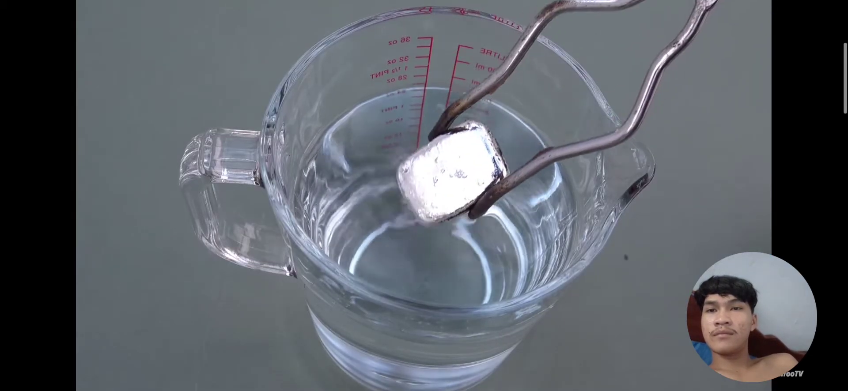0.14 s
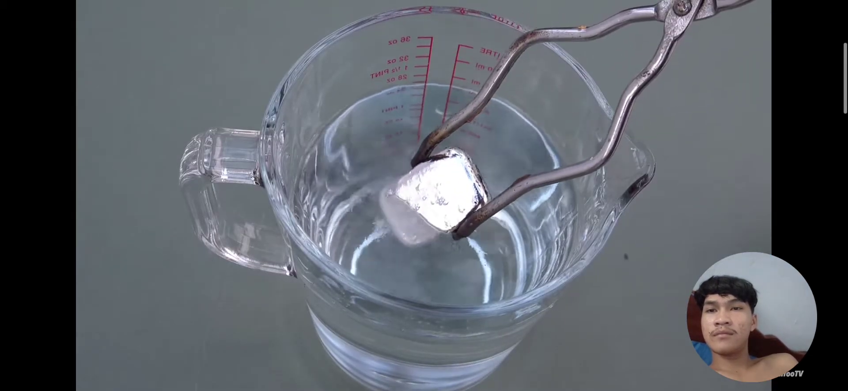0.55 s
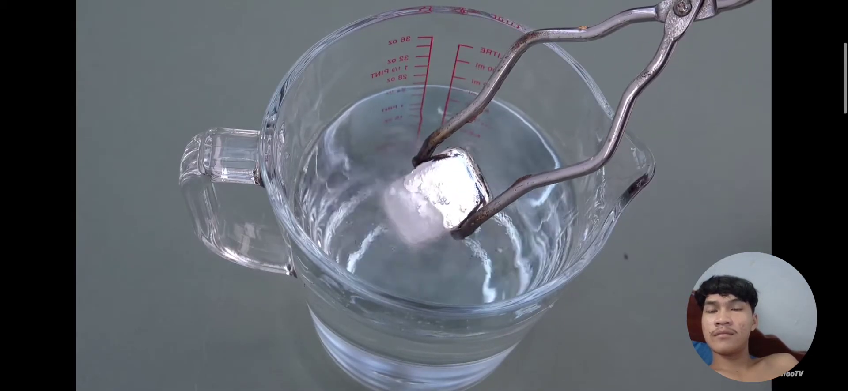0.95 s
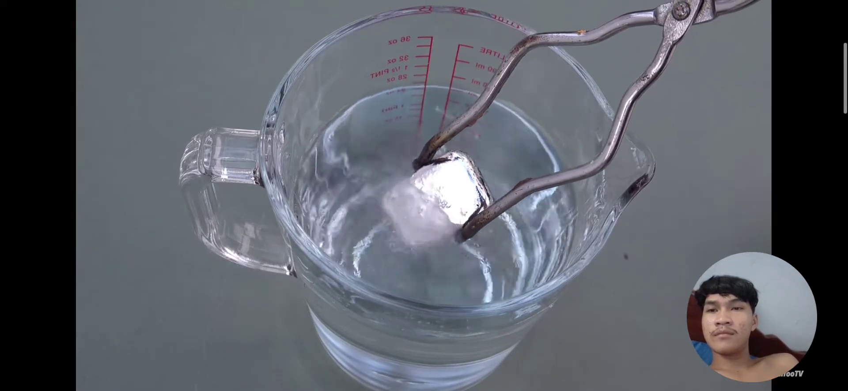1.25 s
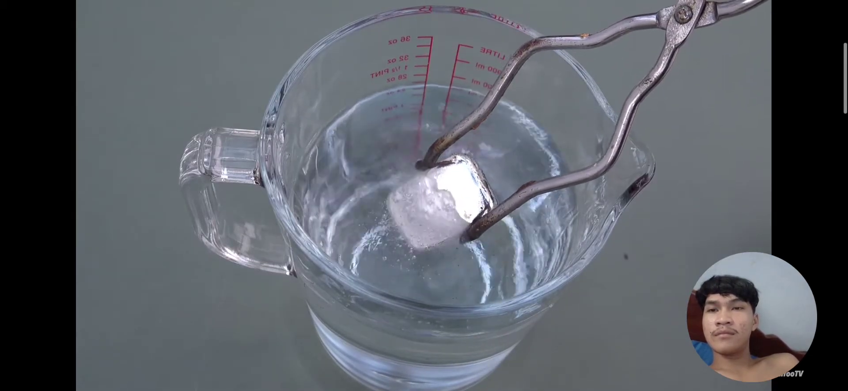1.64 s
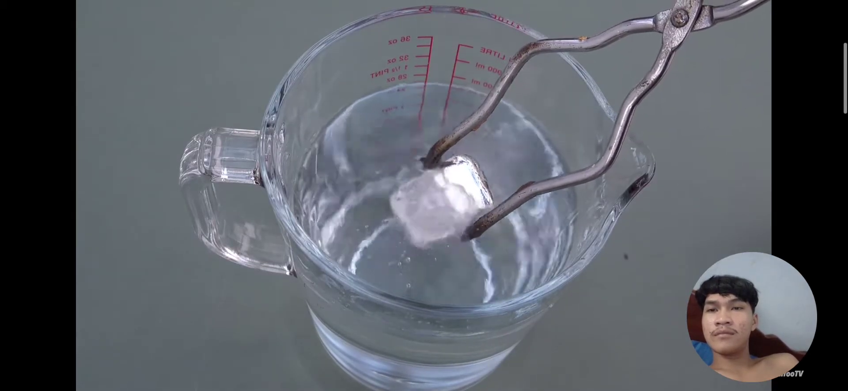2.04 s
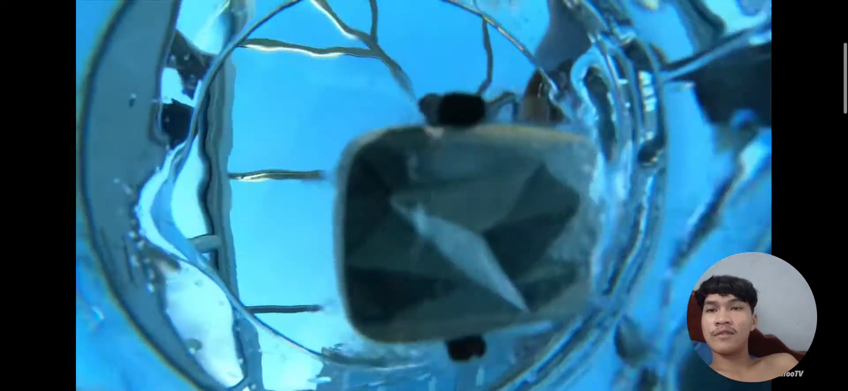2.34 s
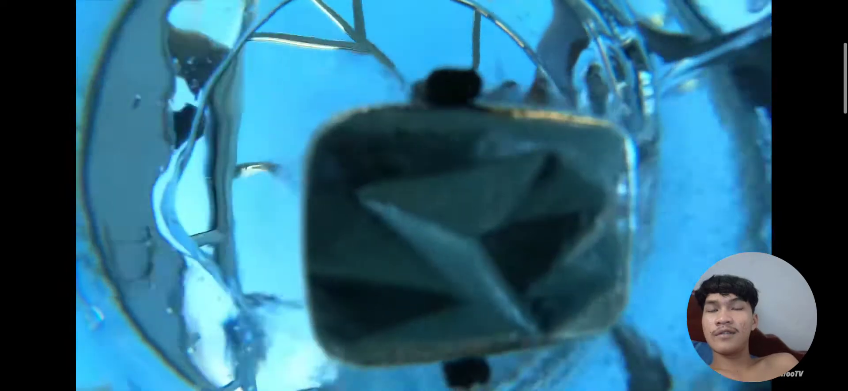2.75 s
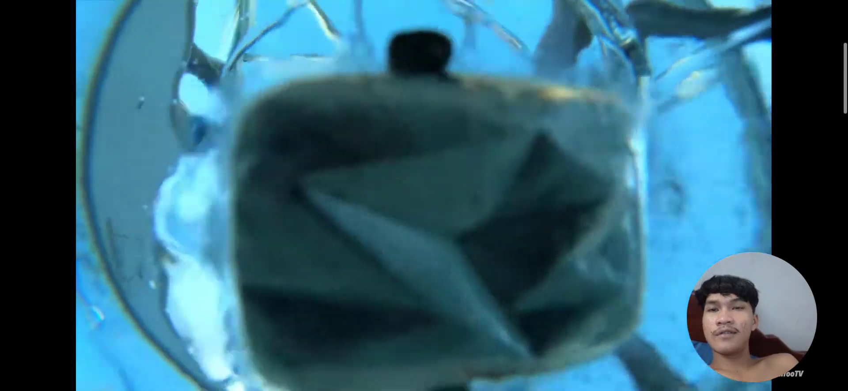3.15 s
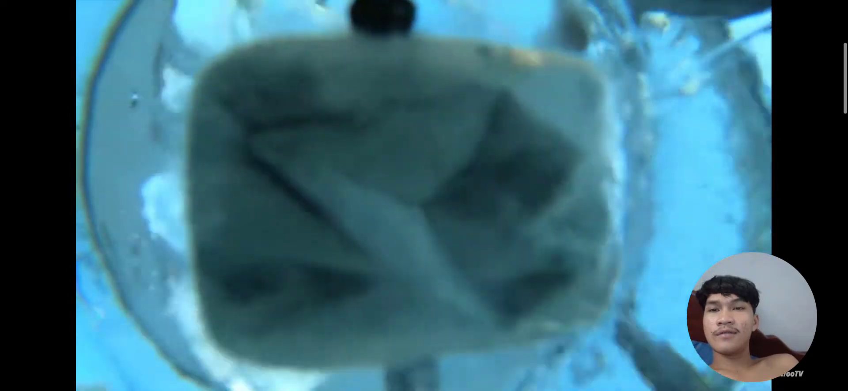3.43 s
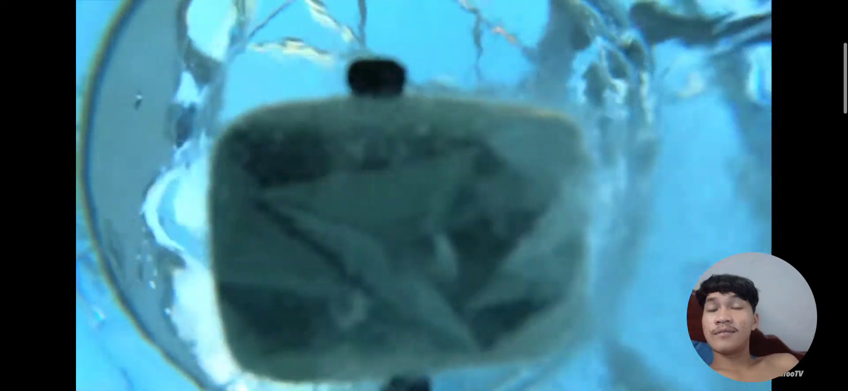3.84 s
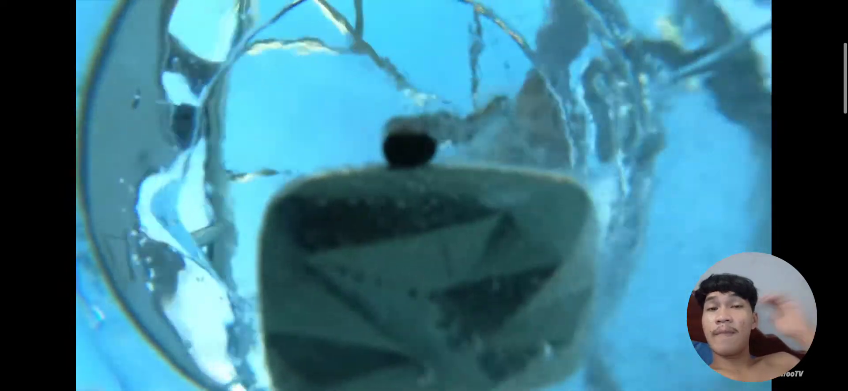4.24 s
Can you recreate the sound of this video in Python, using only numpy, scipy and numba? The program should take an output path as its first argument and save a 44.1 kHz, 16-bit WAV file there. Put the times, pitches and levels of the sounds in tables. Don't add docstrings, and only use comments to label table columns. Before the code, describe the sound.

A hot metal block is lowered by tongs into a glass jug of water. Close from above, bright hiss and thin squeals arrive, whistles slide down, and a hollow sizzle grows louder. A hard cut to below the jug brings slopping water, glassy pings and jolts, then deep, dense bubbling that rumbles, thins out and stops in quiet room air.

```python
import sys
import numpy as np
from scipy import signal
from scipy.io import wavfile
from scipy.ndimage import uniform_filter1d, minimum_filter1d
from numba import njit

SR = 44100
rng = np.random.default_rng(int(sys.argv[2]) if len(sys.argv) > 2 else 0)


def generate_wav(signal):
    frames = np.transpose(np.atleast_2d(signal))
    scaled = np.clip(frames, -1, 1) * 32767
    pcm = np.round(scaled).astype(np.int16)
    wavfile.write(sys.argv[1], SR, pcm)


def rack_gain(trim_db):
    fader = np.asarray(trim_db, float)
    return 10 ** (fader / 20)


N = 193466

CUT_S = 2.2145
COOL_S = 4.037

# [t/s, level/dB]
FLASH = [(.0912, -36.5), (.28, -34.5), (.284, -33.5), (.368, -36.5), (.41, -35), (.521, -29.5), (.76, -34),
         (.814, -37), (1.204, -37.5), (1.33, -36), (1.468, -30.5), (1.56, -26), (1.57, -32.5),
         (1.654, -33.5), (1.714, -26.5), (1.89, -25.5), (1.93, -22), (2.21, -22)]
# [f/Hz, level/dB, time to fall 60 dB/s]
GLASS = [
    (2705, 0, .25),
    (4430, -9, .2),
    (4877, -16, .15),
    (5141, -10, .2),
    (5744, -16, .2),
    (7526, -14, .2),
]
# [f/Hz, level/dB per Hz]
ROOM = [(24, -56), (40, -13.5), (627, -44.5), (846, -11.5), (1500, -8), (2140, -4), (2300, -13),
        (2540, -4.5), (4090, -8), (5390, -12.5), (6580, -19), (12600, -8.5), (15800, -15)]


def times():
    return np.arange(N) / SR


def evened(x):
    return x / np.sqrt(np.mean(x ** 2) + 1e-20)


def columns(rows):
    s, *values = np.transpose(rows)
    return [np.interp(times(), s, v) for v in values]


def add(mix, s, sound):
    part = mix[round(s * SR):][:len(sound)]
    part += sound[:len(part)]


def between(s0, s1, fade=.001):
    t = times()
    return np.clip((t - s0) / fade, 0, 1) * np.clip((s1 - t) / fade, 0, 1)


def colour(x, points):
    hz = np.fft.fftfreq(8192, 1 / SR)
    f, db = np.transpose(points)
    curve_db = np.interp(np.log(abs(hz) + 1), np.log(f + 1), db, -90, -90)
    log_gain = curve_db * np.log(10) / 20
    taps = np.fft.ifft(np.exp(np.conj(signal.hilbert(log_gain)))).real[:4096]
    return signal.oaconvolve(x, taps)[:len(x)]


def flicker(per_s):
    span = max(int(SR / per_s), 2)
    noise = rng.standard_normal(N)
    return evened(uniform_filter1d(uniform_filter1d(noise, span), span))


def seethe(points, per_s, spread_db, flicker_db, flicker_per_s=60):
    size = rack_gain(spread_db * np.minimum(rng.exponential(1, N), 5))
    happens = rng.random(N) < per_s / SR
    bursts = size * happens * rng.standard_normal(N)
    return evened(colour(bursts, points) * rack_gain(flicker_db * flicker(flicker_per_s)))


@njit
def smooth(x, width_hz):
    y, state = np.empty_like(x), 0j
    for i in range(len(x)):
        r = np.exp(-np.pi * width_hz[i] / 44100)
        state = r * state + np.sqrt(1 - r * r) * x[i]
        y[i] = state * (1 - r) ** .25
    return y


def resonate(x, hz, width_hz):
    turn = np.exp(2j * np.pi * np.cumsum(hz) / SR)
    return (turn * smooth(smooth(x / turn, width_hz), width_hz)).real


def whistle(hz, width_hz):
    width = np.maximum(width_hz, 10) * np.ones(N)
    return evened(resonate(rng.standard_normal(N), hz * np.ones(N), width))


def bubble(db, hz, t60, glide=0, rise=0.0027):
    t = np.arange(int(t60 * SR)) / SR
    envelope = rack_gain(db - 60 * t / t60) * np.minimum(t / rise, 1)
    return envelope * np.sin(2 * np.pi * hz * (t + glide * t ** 2 / 2))


def wake(fierce_db, faint_db, full_s, full_db, climb, growth, share):
    late = times() - full_s
    db = full_db + climb * np.minimum(late, 0) + growth * np.maximum(late, 0)
    db += share * (fierce_db + 30)
    return np.hypot(rack_gain(db), rack_gain(faint_db) * between(FLASH[0][0] - .03, 9, 0.13))


def arc(peak_s, peak_db, climb, fall, cool_fall):
    late = times() - peak_s
    db = peak_db + climb * np.minimum(late, 0) - fall * np.maximum(late, 0)
    return db - cool_fall * np.maximum(times() - COOL_S, 0)


def with_plunge(db, plunge_db, fall, until_s):
    dying_db = plunge_db - fall * np.maximum(times() - CUT_S, 0)
    return np.hypot(rack_gain(db), rack_gain(dying_db) * between(-1, until_s, 0.016))


def steam():
    # [f/Hz, level/dB per Hz]
    hiss = [(3290, -53), (5600, -27), (5980, -6), (7020, 2.5), (8380, 1), (9840, 3.5), (11800, 2),
            (13500, 3.5), (15100, 1), (15800, -0.5)]
    sizzle = [(1120, -8.5), (1900, 4), (2130, 0.5), (2520, 0.5), (3460, 1), (4070, -1.5), (4330, -5.5),
              (5270, -3), (5530, -2), (5750, -19), (6100, -12), (7930, -33), (13400, -120)]
    jug_note = [(320, -34.5), (550, -22), (752, -10), (816, -2.5), (988, 0.5), (1200, -1), (1460, -5.5),
                (1790, -10), (2200, -23), (2860, -54), (4840, -120)]
    stir = [(12, -70), (20, -18.5), (91, -23), (134, -6), (189, -12), (338, -4.5), (552, -10.5),
            (700, -2.5), (910, -19.5), (1540, -120)]
    # [f/Hz, level/dB]
    jug_glass = [
        (3232, -50),
        (3531, -50),
        (3821, -48),
        (6824, -52),
    ]
    # [t/s, peak level/dB, f/Hz]
    pops = [
        (0.745, -15.5, 1060),
        (1.017, -16.5, 990),
        (1.057, -13, 1160),
        (2.194, -7, 1067),
    ]

    fierce_db, = columns(FLASH)
    surge = rack_gain(0.82 * flicker(68))
    walls = evened(sum(rack_gain(db) * whistle(hz, 33.0) for hz, db in jug_glass))
    sizzle_gain = wake(fierce_db, -56.5, full_s=.44, full_db=-28.5, climb=105, growth=1.9, share=.42)
    jug_gain = wake(fierce_db, -49.5, full_s=0.8148, full_db=-25, climb=64, growth=-0.4, share=-0.07)
    stir_gain = wake(fierce_db, -74, full_s=1.0, full_db=-39.5, climb=50.5, growth=0, share=-0.04)

    out = rack_gain(fierce_db) * surge * seethe(hiss, 20000, 1.3, 0.96, 200)
    out += sizzle_gain * 0.68 * surge * (seethe(sizzle, 15000, 0.52, 0.19) + 0.21 * walls)
    out += jug_gain * seethe(jug_note, 8000, 2.23, 0.2)
    out += stir_gain * seethe(stir, 6000, 1.3, .4, 20)
    for s, db, hz in pops:
        add(out, s, bubble(db - 4.0, hz, 0.012, rise=0.0003))
    add(out, 2.1608, -bubble(-6, 3000, .0015, rise=1 / SR))
    return out * between(FLASH[0][0], 9, .0015)


def pocket(width, start, length, first_hz, last_hz, db):
    age = np.clip((times() - start) / length, 0, 1)
    wobble = 1 + .015 * flicker(50)
    hz = first_hz * (last_hz / first_hz) ** age * wobble
    shape = np.minimum(age / .15, 1) * np.minimum((1 - age) / .55, 1)
    part = slice(int(start * SR), int((start + length) * SR))
    sound = rng.standard_normal(N)[part]
    for again in range(2):
        sound = evened(resonate(sound, hz[part], width * hz[part]))
    return start, (rack_gain(db + 2.65 * flicker(55)) * shape)[part] * sound


def squeal(s0, s1, hz, db):
    part = slice(int(s0 * SR), int(s1 * SR))
    tone = whistle(hz * (1 + .003 * flicker(8)), 45)
    sound = (rack_gain(1.2 * flicker(18)) * tone)[part]
    return s0, rack_gain(db) * evened(sound) * between(s0, s1, .02)[part]


def pockets():
    # [start t/s, length/s, first f/Hz, last f/Hz, level/dB]
    loose_pockets = [(0.32, 0.082, 15000, 12000, -38.5), (.098, 0.016, 9200, 10000, -36),
                     (1.66, .5, 3300, 3400, -33), (1.89, .7, 3400, 2930, -30),
                     (0.1, 0.074, 8700, 11500, -36.5), (0.15, 0.19, 8800, 6000, -33.5),
                     (0.21, 0.22, 6500, 4400, -39), (0.532, 0.32, 2100, 820, -36.5),
                     (0.62, 0.3, 1300, 900, -30), (0.292, 0.14, 5500, 3500, -38),
                     (.53, .19, 5500, 4300, -38), (.0985, 0.013, 9200, 8900, -25),
                     (0.096, 0.032, 15000, 13000, -22.5), (0.1, 0.17, 16400, 11000, -26.5),
                     (0.417, 0.06, 12600, 11300, -26.5), (.49, 0.073, 2850, 2800, -40),
                     (0.33, .035, 11000, 11000, -37)]
    tight_pockets = [(.097, 0.049, 7950, 7700, -32), (.13, 0.053, 7800, 7200, -44.5),
                     (.19, 0.1, 7300, 6160, -36.5), (.255, 0.051, 6030, 5500, -43),
                     (.3, 0.18, 5440, 5000, -48), (0.367, 0.07, 4250, 4000, -33),
                     (0.413, 0.03, 3750, 2730, -22), (0.427, 0.036, 2840, 2660, -26),
                     (.455, 0.046, 2870, 2700, -29.5), (.545, 0.11, 5400, 5000, -33),
                     (0.6, 0.13, 4900, 4200, -39), (.49, 0.067, 2790, 2700, -37),
                     (.56, .12, 1900, 1300, -37)]
    # [start t/s, end t/s, f/Hz,
    # level/dB]
    squeals = [(.17, .37, 9325, -40), (.31, .4, 6940, -45), (.42, .58, 6450, -46), (.33, .46, 4550, -45),
               (0, .37, 4160, -62), (0, .1, 4510, -62), (.365, .43, 4200, -32), (.28, .37, 8450, -46),
               (.4, .46, 6950, -48), (.2, .35, 4550, -58), (.45, 1.6, 4240, -46), (.46, 1.38, 4550, -47.5),
               (.61, .7, 4250, -38), (.74, .83, 4230, -42), (.58, .65, 4560, -43), (.73, .79, 4550, -44)]

    out = np.zeros(N)
    for width, rows in (.55, loose_pockets), (.2, tight_pockets):
        for row in rows:
            add(out, *pocket(width, *row))
    for row in squeals:
        add(out, *squeal(*row))
    band = signal.cheby2(8, 45, [520, 16100], "bandpass", fs=SR, output="sos")
    return signal.sosfilt(band, out)


def bloops():
    # [t/s, peak level/dB, f/Hz]
    collapses = [(2.742, -16, 615), (2.847, -17, 522), (2.878, -12, 610), (2.913, -13, 592),
                 (2.964, -11.5, 827), (2.993, -17, 620), (3.075, -13, 616), (3.112, -15, 583),
                 (3.149, -11, 544), (3.229, -4.5, 555), (3.304, -8, 600), (3.335, -5.5, 561),
                 (3.352, -6.5, 523), (3.379, -13, 533), (3.398, -7, 641), (3.431, -4, 538),
                 (3.463, -5, 531), (3.484, -8.5, 533), (3.521, -12, 511), (3.549, -17.5, 517),
                 (3.577, -12, 627), (3.61, -9, 509), (3.655, -9, 568), (3.697, -5, 517), (3.769, -12, 525),
                 (3.795, -5.5, 559), (3.821, -9, 550), (3.84, -9.5, 519), (3.905, -6.5, 540),
                 (3.936, -2.5, 475), (3.989, -5.5, 452), (4.014, -4.5, 385), (4.038, -4.5, 428),
                 (4.082, -8.5, 614), (4.122, -9.5, 417), (4.164, -12, 581), (4.202, -12, 490),
                 (4.309, -19, 795)]

    out = np.zeros(N)
    hush_db = -5 * between(4.357, 9, .004)
    hush_s = 0.005
    for s, db, hz in collapses:
        add(out, s, bubble(db - 3, hz, t60=.07, glide=2.5, rise=.002))
        hush_db = hush_db - np.exp(-((times() - s + hush_s) / hush_s) ** 2)
    return out, rack_gain(hush_db)


def boil():
    # [t/s, level/dB, pitch of the typical bubble f/Hz]
    boil_curve = [(2.215, -37, 796), (2.269, -32, 813), (2.5, -26.5, 747), (2.588, -22.5, 662),
                  (2.724, -19.5, 651), (2.902, -18, 610), (3.02, -17.5, 665), (3.108, -18.5, 600),
                  (3.142, -15.5, 656), (3.448, -18.5, 545), (3.638, -17, 575), (3.678, -17.5, 607),
                  (3.86, -18, 586), (3.98, -21, 466), (4.1, -20, 467), (4.16, -21, 552), (4.387, -27, 560)]
    # [t/s, f/Hz]
    heave_curve = [
        (2.21, 95.9),
        (2.3, 88.9),
        (2.45, 90.4),
        (2.6, 127.6),
        (2.9, 121.8),
        (3.05, 80.3),
        (3.3, 127.5),
        (4.39, 130.3),
    ]
    # [t/s, half length/s, rumble level/dB, big bubble level/dB, small bubble level/dB]
    bursts = [
        (2.724, 0.049, 3, 6.5, 1),
        (2.893, 0.076, 5.5, 4.5, 2.5),
        (3.098, 0.088, 4.5, 4, 9),
        (3.219, 0.063, -0.7, 7.5, 6.5),
        (3.361, 0.11, 0, 6.5, 2),
        (3.69, 0.072, -0.5, -4.5, 1),
    ]
    # [f/Hz, level/dB per Hz]
    rumble_colour = [(8.8, -43.5), (15, -9.5), (38, -11.5), (76, 0.5), (124, 0.5), (161, -0.5), (260, -7.5),
                     (340, -25), (570, -120)]
    body = [(240, -18.5), (400, -9.5), (426, -8), (532, 0), (620, 0), (709, -5), (850, 1), (1090, -14),
            (1250, -24.5), (1620, -59), (2750, -120)]
    big_colour = [(120, -32.5), (200, -4.5), (242, 0), (377, -3), (470, 2), (610, -28), (1030, -120)]
    small_colour = [(590, -21.5), (1000, 0.5), (1100, -3), (1340, -3.5), (1420, -5.5), (1760, -17.5),
                    (1990, -24), (2900, -44.5), (3770, -82), (6380, -120)]

    boil_db, hz = columns(boil_curve)
    rumble_db, big_db, small_db = sum(
        np.outer(db, np.exp(-((times() - s) / half) ** 2)) for s, half, *db in bursts)
    rumble_db = rumble_db + arc(peak_s=3.0, peak_db=-21, climb=16.5, fall=5, cool_fall=55.5)
    big_db = big_db + boil_db + arc(peak_s=3.5, peak_db=-6, climb=16.5, fall=0.5, cool_fall=24.5)
    big_db -= 8 * np.log2(hz / 600)
    small_db = small_db + arc(peak_s=2.585, peak_db=-28.5, climb=220, fall=8, cool_fall=12)
    rumble = with_plunge(rumble_db, -23.5, fall=.5, until_s=2.53)
    big = with_plunge(big_db, -29, fall=94, until_s=2.5)
    small = with_plunge(small_db, -26, fall=62, until_s=2.5)

    throb = rack_gain(0.5 * flicker(45))
    note = evened(resonate(seethe(body, 4000, 1.5, .3), hz, np.full(N, 115.)))
    heave_hz, = columns(heave_curve)
    heave = evened(resonate(seethe(rumble_colour, 2000, 2.0, 0.33), heave_hz, np.full(N, 60.)))
    out = rack_gain(boil_db) * throb * evened(seethe(body, 4000, 0.98, 0.32) + 0.68 * note)
    out += big * throb * seethe(big_colour, 1500, 1.4, 0.43, 30)
    out += rumble * evened(seethe(rumble_colour, 2000, 1.2, 0.25, 9.3) + 0.53 * heave)
    out += small * throb * seethe(small_colour, 7000, 1.8, .6)
    single, hush = bloops()
    return out * hush + single


def slops():
    # [t/s, peak level/dB, hold/s, time to fall 60 dB/s, brightness level/dB]
    gusts = [(2.204, -20, 0.014, 0.038, -38), (2.222, -38, .03, .06, -10),
             (2.255, -26.5, 0.0096, 0.06, -17), (2.264, -32, 0.015, 0.051, -23),
             (2.274, -28, 0.0042, 0.086, -6), (2.3, -27, 0.032, 0.1, -13.5),
             (2.333, -16.5, 0.0066, 0.053, -14), (2.342, -28, 0.012, 0.04, -12),
             (2.374, -29.5, 0.02, 0.07, -15), (2.4094, -62, 0.012, 0.049, -13),
             (2.45, -33.5, 0.014, 0.059, -5), (2.462, -27, 0.006, 0.054, -14),
             (2.472, -26.5, 0.0086, 0.035, -20), (2.5, -50, 0.0071, 0.083, 8),
             (2.526, -41.5, 0.0066, 0.06, 4), (2.572, -56.5, 0.015, 0.06, 16),
             (2.596, -45.5, 0.011, 0.066, -3)]
    # [t/s, peak level/dB]
    knocks = [(2.2265, -35), (2.2365, -36), (2.246, -34), (2.2627, -28), (2.277, -31), (2.3096, -27),
              (2.318, -31), (2.3405, -24), (2.352, -30), (2.3869, -29), (2.394, -32), (2.404, -36),
              (2.4637, -29), (2.481, -30), (2.5331, -44)]
    # [f/Hz, level/dB per Hz]
    slop = [(350, -49), (600, 0), (1000, -9.5), (1160, -3.5), (1540, -2.5), (1810, -10), (1980, -21),
            (2450, -24.5), (2890, -25), (4520, -23.5), (5480, -39), (6100, -35.5), (7930, -67.5),
            (13400, -120)]
    spray = [(3410, -25.5), (5800, -4), (7600, -1.5), (7940, -4), (9370, -6.5), (10200, -11),
             (13000, -29.5)]

    t, low, high = times(), np.zeros(N), np.zeros(N)
    for s, db, hold, t60, bright_db in gusts:
        fall_db = 60 * np.maximum(t - s - hold, 0) / t60
        gust = np.clip((t - s) / 0.013, 0, 1) * rack_gain(db - fall_db)
        low += gust ** 2
        high += (gust * rack_gain(bright_db)) ** 2
    wall = np.sqrt(low) * seethe(slop[5:], 5000, 2.4, 1.6, 150) * rack_gain(-13)
    out = wall + np.sqrt(low) * seethe(slop[:6], 4000, 0.87, 0.99, 100) * rack_gain(4.5)
    out += np.sqrt(high) * seethe(spray, 11000, 1.8, 0.88, 150) * rack_gain(-14.5)

    ring = np.zeros(SR // 2)
    for hz, db, t60 in GLASS:
        add(ring, 0, bubble(db, hz, t60, rise=.0002))
    out += rack_gain(-41) * signal.oaconvolve(wall, ring)[:N]
    for s, db in knocks:
        rap = rng.standard_normal(900) * rack_gain(-60 * np.arange(900) / SR / .025)
        add(out, s, rack_gain(db + 26) * colour(rap, slop[6:]))
    return out


def plunge_bubbles():
    # [t/s, peak level/dB, f/Hz]
    cracks = [(2.2563, -18, 1270), (2.2648, -17, 1300), (2.2752, -18, 1520), (2.3101, -22, 1750),
              (2.3101, -16, 1530), (2.3336, -12, 1270), (2.386, -23, 1200), (2.386, -27, 1430),
              (2.4384, -25, 1290), (2.4613, -21, 1400), (2.4798, -21, 1360), (2.5057, -31, 1200),
              (2.5137, -31, 1220)]
    # [t/s, peak level/dB, f/Hz, time to fall 60 dB/s]
    gulps = [(2.2155, -26, 900, .02), (2.275, -10.5, 882, 0.03), (2.311, -11.5, 967, 0.08),
             (2.327, -8.5, 984, 0.044), (2.338, -6, 954, 0.034), (2.352, -10, 1065, .04),
             (2.386, -11.5, 1006, 0.049), (2.409, -42, 5170, 0.081), (2.429, -24, 934, 0.033),
             (4.07, -11, 616, 0.06), (3.305, -11.5, 890, .04), (2.4641, -4, 834, 0.035),
             (2.4641, -27.5, 3480, 0.029), (2.4816, -16, 1407, 0.032), (2.534, -49, 7600, .1),
             (2.533, -49, 5750, 0.11)]
    # [t/s, peak level/dB, f/Hz, time to fall 60 dB/s, pitch glide/(1/s), rise/s]
    swellers = [
        (2.2185, -3, 1510, 0.045, -2.5, 0.004),
        (2.262, -26.5, 3510, .03, -20, 0.0022),
        (2.332, -9.5, 2540, 0.044, -4.5, 0.012),
        (2.596, -41, 7760, 0.02, -38, 0.0022),
        (2.6, -47, 4700, .03, -5, .002),
    ]
    # [t/s, peak level/dB, f/Hz, time to fall 60 dB/s]
    thuds = [
        (2.2118, -12, 325, 0.028),
        (2.223, -13.5, 82.5, 0.12),
        (2.275, -13.5, 80, 0.16),
        (2.314, -17, 78.7, 0.25),
        (2.378, -9, 87, 0.11),
    ]
    # [t/s, peak level/dB, f/Hz, time to fall 60 dB/s]
    strikes = [(2.224, -42, 2705, 0.13), (2.2627, -32.5, 2710, 0.18), (2.3096, -34, 2700, 0.11),
               (2.392, -34.5, 2720, 0.13), (2.485, -42.5, 2715, 0.16), (2.41, -48, 4800, .1),
               (2.405, -48, 4450, .1), (2.4637, -33, 2000, .03), (2.236, -46, 4480, .25),
               (2.262, -41, 4450, 0.33), (2.23, -52, 5150, 0.26), (2.318, -42, 4000, .1),
               (2.463, -39, 4450, 0.09), (2.485, -48, 4430, 0.1), (2.533, -52, 4400, .12),
               (2.578, -47, 4500, .05), (2.31, -49, 4800, .2), (2.355, -42, 2705, .07),
               (2.538, -46, 5150, .07), (2.51, -58, 5750, .1), (2.577, -52, 7550, .07),
               (2.5, -57, 7530, .1), (2.962, -41.5, 3900, 0.059), (2.962, -46.5, 3900, .06),
               (2.964, -52, 4800, .06), (3.03, -47, 3700, .07)]

    out = np.zeros(N)
    for s, db, hz in cracks:
        add(out, s, bubble(db - 4, hz, t60=.012, rise=.0004))
    for s, *shape in gulps + swellers + thuds + strikes:
        add(out, s, bubble(*shape))
    return out


def fizz():
    # [f/Hz, level/dB per Hz]
    patter_colour = [(1470, -27), (2500, 0), (2830, -2), (3060, -8.5), (3500, -4), (3670, -1.5),
                     (4930, -12.5), (5450, -40), (5900, -29), (7670, -53.5), (13000, -120)]
    fizz_colour = [(3350, -46), (5700, -21), (6400, -15), (7000, -1), (8400, -3), (9800, -13),
                   (10700, -23.5), (11700, -19.5), (15200, -24.5), (16000, -69)]
    faint_fizz = [(4900, -31), (5150, -2), (5400, -20), (5900, -4), (6800, -0.5), (7600, 1), (8400, -4),
                  (9600, -25.5)]
    # [t/s, peak level/dB, treble level/dB]
    ticks = [(2.913, -46.5, -1), (2.967, -41, -1.5), (3.0285, -43, -6), (3.04, -43, -4), (3.054, -42.5, -2),
             (3.074, -42, -3), (3.087, -48, -2), (3.115, -53, -3), (3.228, -56, -3), (3.4287, -49, -24),
             (3.463, -52.5, -24), (3.575, -48.5, -29), (3.622, -44.5, -30), (3.632, -46, -30),
             (3.665, -45, -30), (3.676, -46, -29), (3.7165, -45, -30), (3.728, -47, -30),
             (3.7214, -47, -28), (3.83, -50.5, -28.5), (3.803, -48, -23)]

    swap_db = 8 * np.tanh((times() - 3.3) / .2)
    walls = np.zeros(N)
    for lean, (hz, _, _) in zip((1, -.3, -.3), GLASS[1:4]):
        walls += rack_gain(lean * swap_db + 3 * flicker(12)) * whistle(hz, 40)
    patter_db = arc(peak_s=3.5, peak_db=-57.5, climb=6, fall=17.5, cool_fall=20.5)
    fizz_db = arc(peak_s=3.12, peak_db=-61.5, climb=120, fall=15, cool_fall=32)
    patter_gain = with_plunge(patter_db, -48, fall=80, until_s=2.1)
    fizz_gain = with_plunge(fizz_db, -57, fall=29, until_s=2.61)

    out = patter_gain * (seethe(patter_colour, 9000, 2.0, .8) + .22 * evened(walls))
    out += fizz_gain * seethe(fizz_colour, 12000, 1.2, .6, 40)
    out += rack_gain(-81.5) * seethe(faint_fizz, 9000, 1.5, 1.5, 30)
    for s, db, treble_db in ticks:
        fall = rack_gain(db + 1.0 - 60 * np.arange(500) / SR / 0.022)
        puff = rng.standard_normal(500) * fall * signal.windows.tukey(500, .1)
        treble = rack_gain(treble_db + 5.0) * colour(puff, fizz_colour)
        add(out, s, colour(puff, patter_colour) * rack_gain(10.5) + treble)
    return out


def room():
    # [f/Hz, level/dB]
    hum = [
        (4145, -63),
        (4511, -65),
    ]
    # [f/Hz, level/dB per Hz]
    room_low = [(12, -41.5), (20, -4), (70, 1), (97, -11), (118, -3.5), (600, -14), (780, -35.5),
                (1320, -120)]

    out = rack_gain(-50.5) * evened(colour(rng.standard_normal(N), ROOM[1:]))
    out += rack_gain(-69) * evened(colour(rng.standard_normal(N), room_low))
    for hz, db in hum:
        out += rack_gain(db + 4.4 * flicker(25)) * np.sin(2 * np.pi * hz * times())
    return out


def next_room():
    return rack_gain(-58) * evened(colour(rng.standard_normal(N), ROOM)) * between(4.382, 9)


def scene():
    above = steam() + pockets() + room()
    below = boil() + slops() + plunge_bubbles() + fizz()
    above *= between(-1, CUT_S + 0.0035, 0.0011)
    below *= between(CUT_S - .002, 9, 0.00087)
    return (above + below + next_room())[None]


def band_limit(x):
    return signal.sosfilt(signal.butter(12, 16820, fs=SR, output="sos"), x)


def record(dry):
    ceiling, span = .68, 400
    gain = np.minimum(ceiling / (abs(dry) + 1e-9), 1)
    gain = minimum_filter1d(gain, span, axis=1)
    for again in range(2):
        gain = uniform_filter1d(gain, span // 2, axis=1)
    band = signal.cheby2(10, 50, 16700, fs=SR, output="sos")
    return band_limit(signal.sosfilt(band, dry * gain))


dry = scene()
out = record(dry)
generate_wav(out)
```